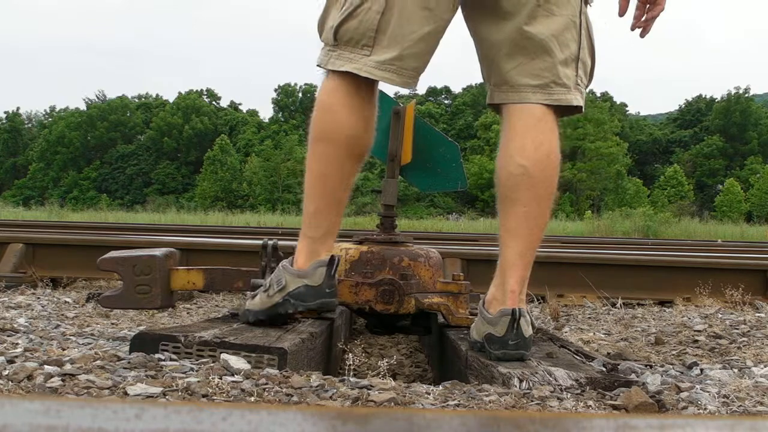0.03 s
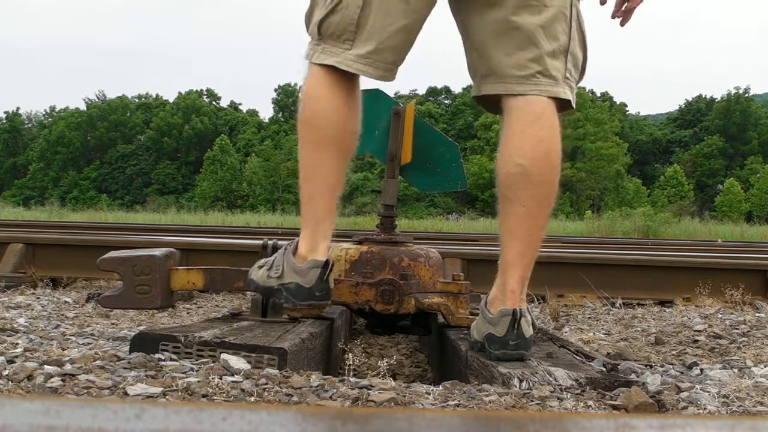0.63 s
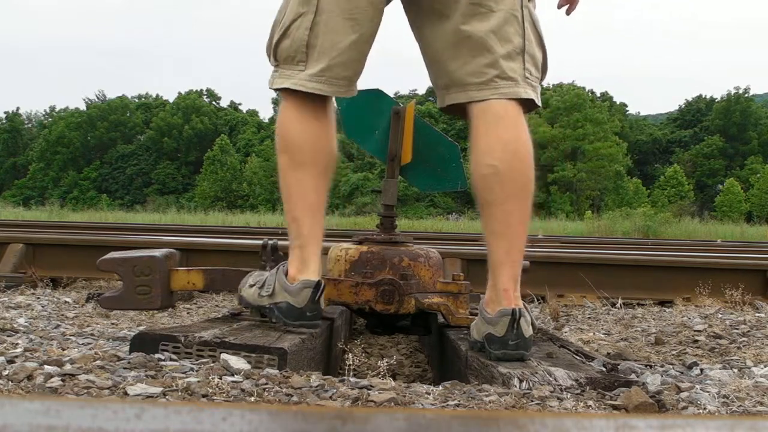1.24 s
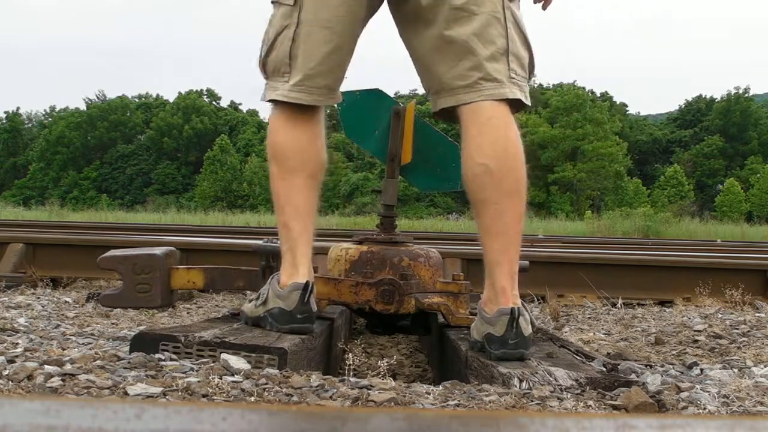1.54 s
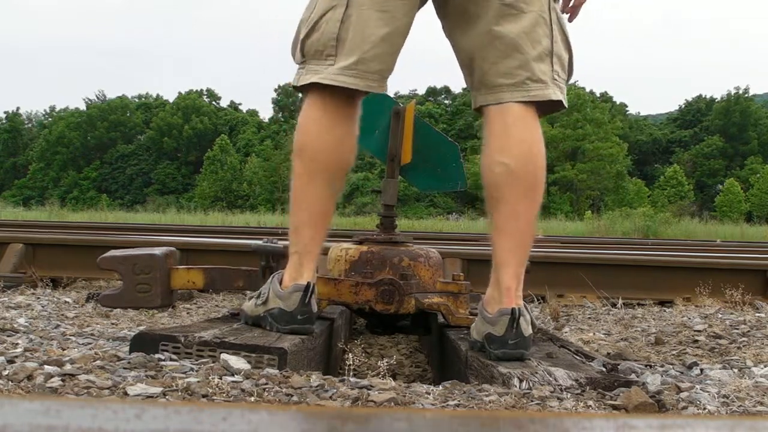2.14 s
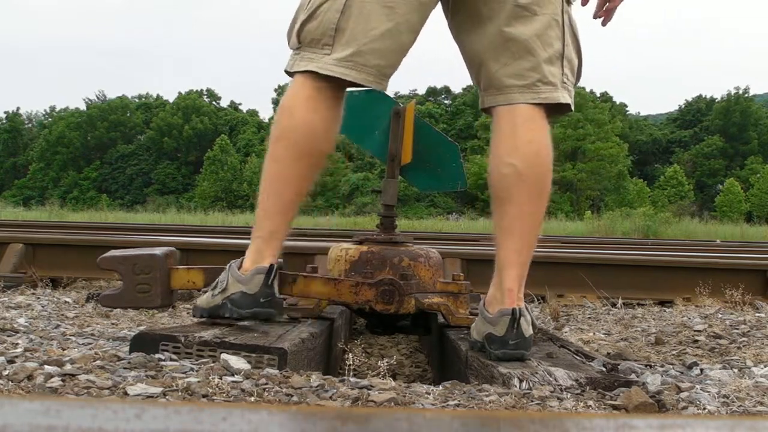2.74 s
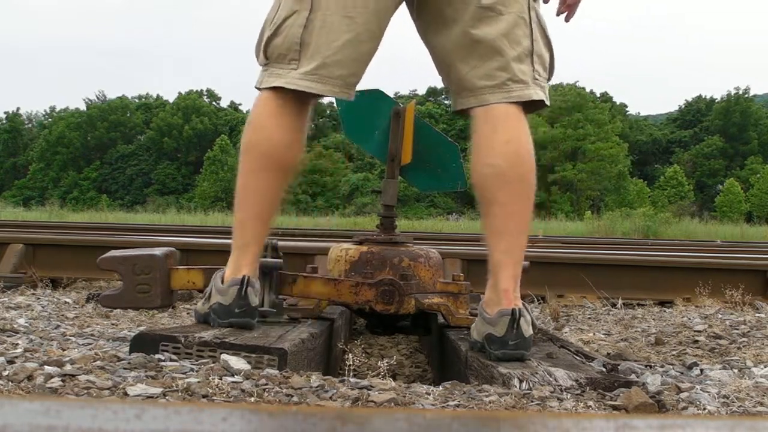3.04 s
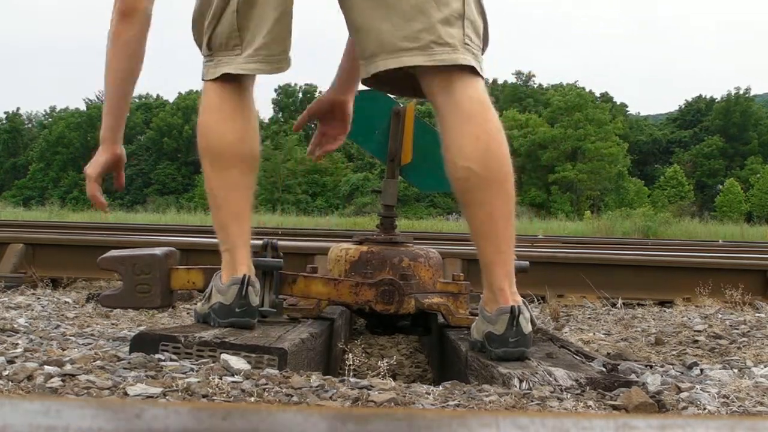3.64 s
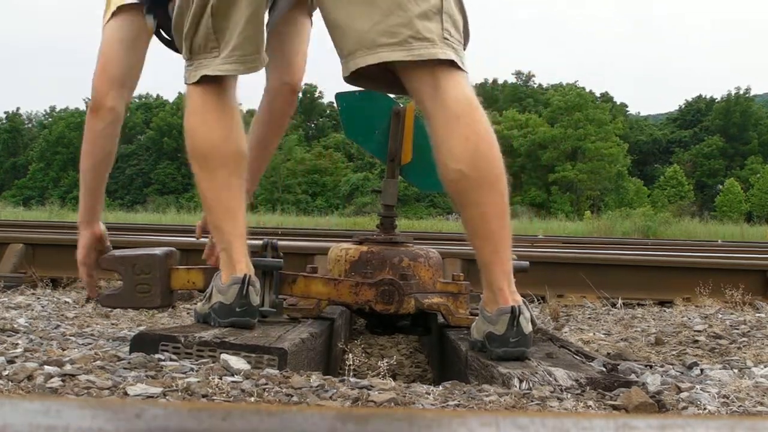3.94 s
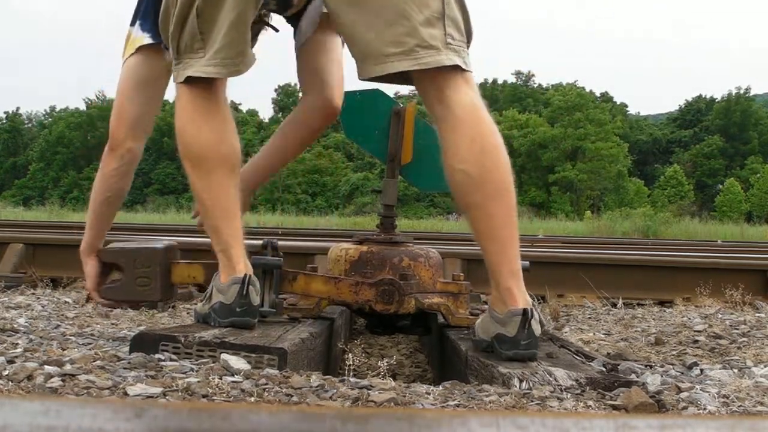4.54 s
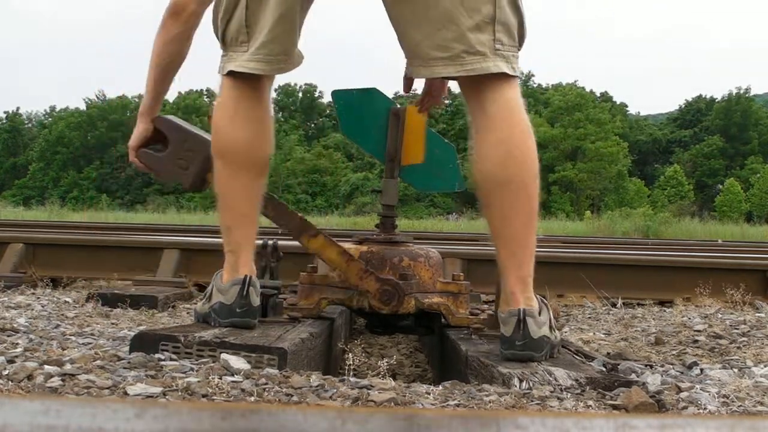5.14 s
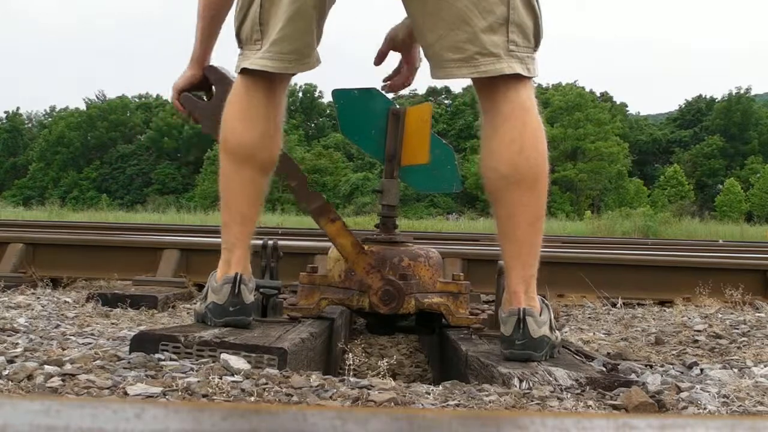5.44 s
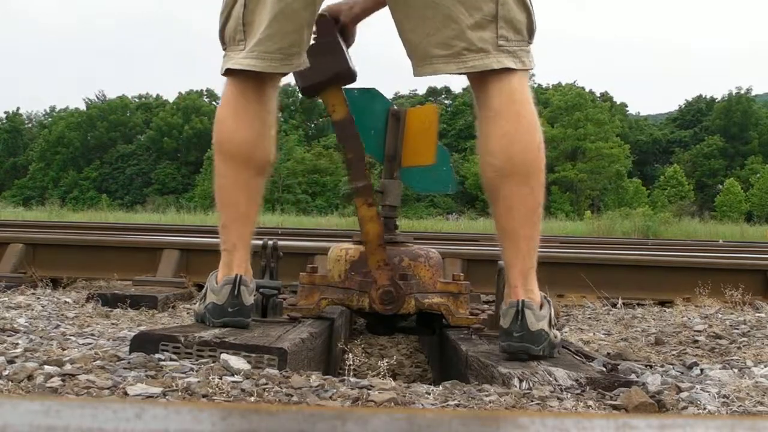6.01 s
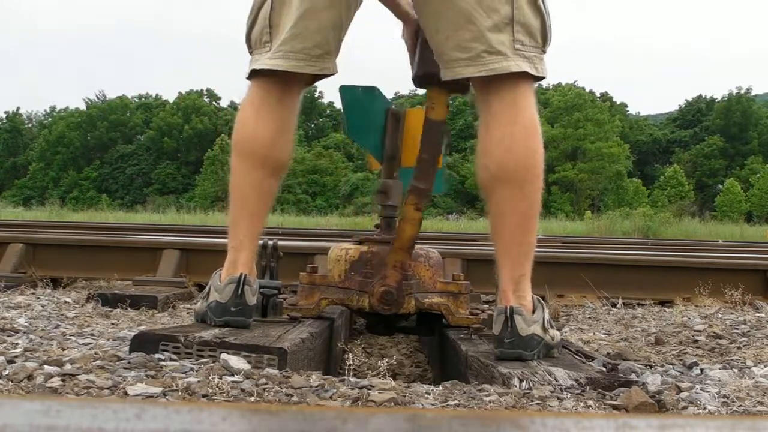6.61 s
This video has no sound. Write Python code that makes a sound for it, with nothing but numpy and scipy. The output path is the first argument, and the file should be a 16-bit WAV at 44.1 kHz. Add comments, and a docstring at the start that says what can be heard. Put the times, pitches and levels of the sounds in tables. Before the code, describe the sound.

Rusty steel clanks, scrapes and briefly squeals as a track switch lever is unlatched and lifted, with diesel engines rumbling far off.

```python
"""A railroad yard in the open air, two closely spaced microphones a few metres from a switch stand.
A foot kicks the rusty latch loose; then the weighted lever is heaved up through it.
Steel knocks on steel and on the timber tie, rust grinds and squeals, and the latch rings.
Ballast and rails scatter the blows, and diesel engines rumble in the distance."""
import sys
import numpy as np
from scipy import signal
from scipy.fft import rfft, irfft, next_fast_len
from scipy.io import wavfile
from scipy.ndimage import uniform_filter1d

SR = 44100
rng = np.random.default_rng(int(sys.argv[2]) if len(sys.argv) > 2 else 0)


def master_out(mix):
    """Clip the mix to full scale and print it as 16-bit PCM to the path in sys.argv[1]."""
    frames = np.transpose(np.atleast_2d(mix))
    ceiling = np.clip(frames, -1, 1)
    pcm = np.round(ceiling * 32767).astype(np.int16)
    wavfile.write(sys.argv[1], SR, pcm)


N = 298548
T = np.arange(16384) / SR  # time axis of one event
HZ = np.fft.rfftfreq(len(T), 1 / SR)


# blows on the stand: start_s, rise_s, clank_db, clatter_db, tilt_db_per_octave
BLOWS = [(0.0315, 0.0015, -36.5, -39.5, -2), (0.0583, 0.00028, -32.5, -21, 2),
         (0.7904, .0005, -35.5, -31, 2), (1.2356, 0.0044, -38.5, -57, -9), (1.3482, .003, -25, -33.5, -7),
         (1.3639, .002, -21.5, -22, 2.5), (1.3786, 0.00013, -19, -12.5, 4), (1.398, .001, -24, -40.5, -1.5),
         (1.4148, .002, -23.5, -28.5, -5), (1.449, 0.0034, -34, -48, -11.5), (1.568, .001, -48, -50, -3.5),
         (2.178, 0.0011, -42.5, -43.5, -2.5), (2.197, .001, -39.5, -45, -2),
         (2.221, 0.0026, -34.5, -45, -4), (2.2913, .0002, -25.5, -35.5, -9.5),
         (2.32, 0.00088, -33, -41.5, -3), (2.346, .005, -32, -53, -11), (2.5083, 0.0035, -51, -55, -7),
         (3.5857, 0.00082, -63, -56.5, 6.5), (3.7437, .001, -70, -46, 1), (4.5671, 0.00026, -32, -42.5, -9),
         (4.583, 0.002, -42.5, -38.5, 0.5), (4.6325, 0.00017, -27, -33, -9.5), (4.6534, .0002, -33, -31, 1),
         (4.675, 0.00084, -54.5, -36.5, -1), (4.7533, 0.00022, -28.5, -34.5, -8.5),
         (4.779, .002, -40.5, -36.5, 3), (4.7972, .0002, -47.5, -25, 3.5),
         (4.951, 0.00021, -32.5, -15.5, 4.5), (5.032, 0.0022, -51.5, -37.5, -0.5),
         (5.539, 0.0029, -51, -50, -7.5), (5.6565, 0.0024, -50, -51.5, -11.5),
         (5.876, 0.0019, -61, -49.5, -4.5)]
# modes of the stand: pitch_hz, level_db, t60_s, group (0 timber, 1 casting)
STAND_MODES = [(135, -3, .42, 0), (157, -1, .28, 0), (192, -2, .13, 0), (290, -3, .11, 0),
               (322, -7, .13, 1), (356, 0, .26, 1), (392, -6, .33, 1), (422, -8, .17, 1), (499, -3, .24, 1),
               (558, -12, .13, 1), (688, -12, .12, 1), (748, -2, .17, 1), (785, -6, .15, 1),
               (829, -2, .13, 1), (900, -4, .15, 1), (948, -7, .14, 1)]
# heavy blows wake the casting's upper modes: clank_db, gain_db
UPPER_MODE_GAIN = [(-28.5, -4.5), (-18, 5)]
# borders of one low clank band and three clatter bands: edge_hz
BAND_EDGES = [200, 1000, 2600, 7000, 17000]

def knocks(joints, clatter_hz=4300, upper_from_hz=650, freed_s=2.0, crack_s=.0013, body_lag_s=.00073):
    """Each blow cracks, clatters in the joints and shakes the casting on its timber."""
    out, waves = np.zeros(N), free_ringing(STAND_MODES)
    edges = np.array(BAND_EDGES)
    bands = np.array([unit(joints * (HZ > lo) * (HZ <= hi)) for lo, hi in zip(edges, edges[1:])])
    octaves = np.log2(np.sqrt(edges[1:-1] * edges[2:]) / clatter_hz)
    upper = np.array(STAND_MODES)[:, :1] > upper_from_hz
    for start, rise, clank_db, clatter_db, tilt_db in BLOWS + rebounds():
        band_db = clatter_db + tilt_db * octaves - 2.5 * octaves ** 2  # a tilted arch
        gains = np.append(.45 * amp(clank_db), amp(band_db))  # part of the clank dies with the clatter
        contact = rfft(unit(grit(spread_db=1.5)))
        clatter = irfft(contact * (gains[:, None] * bands).sum(0), len(T))
        t60 = .047 + 11 * rise  # a softer contact clatters for longer
        crack = .16 * np.exp(-T / crack_s)
        clatter *= (np.exp(-np.log(1000) * T / t60) + crack) * (1 - np.exp(-T / rise))
        thud_db = clank_db + (.5 if start > freed_s else -11.5)  # the freed lever thuds into the timber
        wake = amp(upper * np.interp(clank_db, *np.transpose(UPPER_MODE_GAIN))).astype(np.float32)
        body = ring(STAND_MODES, wake * waves, [thud_db, clank_db], spread_db=3)
        body *= 1 - np.exp(-T / (rise + body_lag_s))
        add(out, start, clatter + .81 * body)
    return out


def rebounds(sharp_s=.0004, delay_s=.047, rise_s=.0022, drop_db=18.5):
    """A sharp blow bounces once, softer and duller."""
    return [(start + delay_s, rise_s, clank_db - drop_db, clatter_db - drop_db, tilt_db - 2.5)
            for start, rise, clank_db, clatter_db, tilt_db in BLOWS if rise < sharp_s]


# spectrum of the rusty joints: frequency_hz, level_db
JOINT_SPECTRUM = [(220, 3.5), (370, 8.5), (610, 4), (820, 2), (1030, -2.5), (1400, 3.5), (2300, -1),
                  (3400, 0.5), (4000, -4), (5000, -1), (6100, -2.5), (7000, -0.5), (8600, -6),
                  (10500, -4.5), (16000, -1.5)]

def joint_colour(ripple_db=8, latch_db=9, width_hz=45):
    """The many close resonances of the rusty assembly; the latch's modes stand out of them."""
    ripple = uniform_filter1d(rng.standard_normal(len(HZ)), size=22)
    ripple = unit(uniform_filter1d(ripple, size=14))
    ripple = np.clip(unit(ripple - uniform_filter1d(ripple, size=130)), -2, 1.5)
    peaks = np.max([1 / (1 + ((HZ - mode[0]) / width_hz) ** 2) for mode in LATCH_MODES], axis=0)
    return amp(read(JOINT_SPECTRUM, HZ) + ripple_db * ripple * (.5 - peaks) + latch_db * peaks)


# modes of the latch: pitch_hz, level_db, t60_s, group (excited together)
LATCH_MODES = [(2770, -10, .07, 0), (3512, 0, .12, 0), (4492, 0, .15, 1), (5020, -12, .1, 1),
               (5457, -10, .13, 1), (5848, -6, .13, 1), (6070, -9, .11, 1), (6192, -7, .15, 1),
               (7498, 0, .29, 2), (9510, -13, .16, 3), (9960, 0, .12, 3), (10704, -12, .12, 3),
               (10909, -12, .14, 3), (12225, -10, .15, 4), (12749, 0, .33, 4), (13762, 0, .2, 5),
               (14320, -9, .1, 5), (15035, -14, .12, 5), (15592, -3, .22, 5)]
# jolts to the latch: start_s, level_db, driven_hz, seat_damping_db_per_s
LATCH_JOLTS = [(0.0581, -29.5, 7200, 19.5), (0.79, -18, 3300, 2000), (1.3818, -16, 5400, 1499.5),
               (1.413, -31.5, 12700, 79), (2.198, -32, 4200, 55), (2.321, -56, 7560, 50),
               (4.585, -39, 4300, 48), (4.6328, -38.5, 12400, 12), (4.656, -30.5, 7300, 13),
               (4.7953, -23.5, 4100, 160), (4.9512, -16.5, 11200, 47), (5.033, -40, 5000, 10)]

def latch(rise_s=.0008, width_octaves=.65, off_pitch_db=-21):
    """The latch rings most near the pitch the contact drives, longer when it hangs free of its seat."""
    out, waves = np.zeros(N), free_ringing(LATCH_MODES)
    hz, _, _, group = np.transpose(LATCH_MODES)
    group_hz = np.array([hz[group == g].mean() for g in np.unique(group)])
    for start, db, driven_hz, damping in LATCH_JOLTS:
        nearness = np.exp(-(np.log2(group_hz / driven_hz) / width_octaves) ** 2)
        ringing = ring(LATCH_MODES, waves, db + off_pitch_db * (1 - nearness), spread_db=2)
        add(out, start, ringing * amp(-damping * T) * (1 - np.exp(-T / rise_s)))
    return out


# steel sticking and slipping: start_s, length_s, pitch_hz, level_db
STICK_SLIPS = [(0.761, 0.024, 3600, -41.5), (1.356, 0.025, 7500, -10.5), (1.375, 0.0099, 5480, -20),
               (1.412, 0.038, 3530, -24.5), (1.461, 0.032, 3535, -42), (2.177, 0.051, 3516, -42),
               (2.318, 0.024, 5000, -53), (2.501, .029, 2084, -53), (4.653, 0.033, 3520, -34.5),
               (4.658, 0.044, 4497, -36.5), (4.711, .022, 3500, -52), (4.79, 0.045, 10930, -30.5),
               (4.797, 0.026, 6066, -35), (4.822, 0.037, 3494, -42), (4.951, 0.051, 5450, -26),
               (4.952, 0.053, 4506, -22), (4.965, 0.036, 3530, -35.5), (4.988, 0.014, 6120, -25.5),
               (5.014, .03, 3530, -46), (5.085, 0.055, 5480, -53.5), (5.535, .04, 3620, -54),
               (5.658, 0.044, 1760, -52), (5.873, 0.054, 3610, -50), (6.555, .044, 3610, -56.5)]

def squeals(waver_hz=28, roughness=.28, faint_db=-37):
    """Friction pumps one mode for a moment, a little unsteadily, then chokes it."""
    out = np.zeros(N)
    for start, length, hz, db in STICK_SLIPS:
        drift, shake = unit(uniform_filter1d(rng.standard_normal((2, len(T))), size=160))
        rise = min(.004 + .05 * max(db - faint_db, 0), length / 2)  # loud squeals build more slowly
        ramp = np.interp(T, [0, rise, length], [0, 1, 0])
        grip = np.sin(np.pi / 2 * ramp ** .67) ** 2
        tone = np.sqrt(2) * np.sin(2 * np.pi * np.cumsum(hz + waver_hz * drift) / SR)
        add(out, start, amp(db) * grip * (1 + roughness * shake) * tone)
    return out


# slides over rust: catch_s, lead_in_s, run_out_s, level_db, tilt_db_per_octave
RUST_SLIDES = [(.059, 0.023, 0.052, -39.5, -1.5), (.795, 0.041, 0.034, -40.5, -3.5),
               (1.365, .026, .01, -29.5, -0.5), (1.388, 0.027, 0.042, -18.5, -3),
               (1.45, 0.0036, 0.117, -44, -4.5), (2.25, 0.068, 0.12, -45, -6.5),
               (4.42, 0.014, 0.027, -53, -3), (4.646, .05, .035, -37.5, -3), (4.799, .04, .035, -34, -3),
               (4.955, .033, 0.051, -26.5, 0.5), (5.54, 0.0035, 0.025, -44, -8.5),
               (5.878, .003, 0.025, -46, -12), (6.12, 0.033, .06, -57, -3)]

def scrapes(joints, low_hz=300, pivot_hz=4000, swell_db=11.5, fade_db=10.5):
    """Rust flakes break and rattle the joints, harder until the parts catch, then easing off."""
    out = np.zeros(N)
    for catch, lead, run_out, db, tilt_db in RUST_SLIDES:
        length = lead + run_out
        tilt = amp(tilt_db * np.log2((HZ + low_hz) / pivot_hz))
        low_cut = HZ ** 2 / (HZ ** 2 + low_hz ** 2)
        force = amp(db - np.interp(T, [0, lead, length], [swell_db, 0, fade_db]))
        force *= (1 - np.exp(-T / .0025)) * np.exp(-np.maximum(T - length, 0) / .0018)  # soft ends
        grinding = irfft(rfft(grit(spread_db=4.5)) * joints * tilt * low_cut, len(T))
        add(out, catch - lead, force * unit(grinding))
    return out


# two faint whistles during the lever's swing: start_s, length_s
SWING_WHISTLES = [(5.947, 0.055), (6.102, 0.097)]

def whistles(pitch_hz=3250, fall_octaves_per_s=5.5, level_db=-63):
    """A thin tone swells and slides down, barely above the background."""
    out = np.zeros(N)
    hz = pitch_hz * 2 ** (-fall_octaves_per_s * T)
    for start, length in SWING_WHISTLES:
        swell = np.sin(np.pi * np.minimum(T / length, 1))
        add(out, start, amp(level_db) * swell * np.sin(2 * np.pi * np.cumsum(hz) / SR))
    return out


# decay of sound scattered by open ground: frequency_hz, t60_s
GROUND_DECAY = [(150, .5), (1000, .42), (5000, 0.27), (15000, 0.11)]

def ground_echoes(direct, near_db=-15, near_s=.006, far_db=-24):
    """Adds quick reflections off ballast and rails and a thin tail, different at each microphone."""
    near, far = rng.standard_normal((2, 2, len(T)))
    near *= np.exp(-T / near_s) * (T > .001)
    hz, t, spectra = signal.stft(far, SR, nperseg=256)
    spectra *= np.exp(-np.log(1000) * t / read(GROUND_DECAY, hz)[:, None])
    far = signal.istft(spectra, SR)[1][:, :len(T)] * (T > .012)
    echoes = sum(amp(db) * taps / np.linalg.norm(taps, axis=1, keepdims=True)
                 for db, taps in [(near_db, near), (far_db, far)])
    return direct + signal.oaconvolve(direct[None], echoes, axes=1)[:, :N]


# the yard's background: frequency_hz, level_db
YARD_SPECTRUM = [(20, -36), (35, -23.5), (55, -13), (72, -3), (125, -6), (180, -9.5), (260, -14.5),
                 (450, -20), (620, -25), (1200, -31), (2300, -35.5), (4500, -39.5), (8000, -43.5),
                 (16000, -45.5)]
# its likeness at the two microphones: frequency_hz, correlation
YARD_COHERENCE = [(60, 0.67), (130, 0.99), (290, 0.98), (640, 0.89), (1410, 0.76), (3100, 0.41),
                  (6820, 0.079), (15000, 0.08)]
# the engines ease off, then grow a little louder toward the end: time_s, gain_db
ENGINE_SWELL = [(0, 0.86), (4.1, -1.5), (5.3, 2), (6.77, 2.5)]
# spectral humps of far-off machinery: centre_hz, width_hz, gain_db
MACHINE_HUMPS = [(73, 4.9, 4), (94.9, 8, 2), (143.85, 5, 9.5), (401, 36, 7), (1832, 140, 5.5),
                 (2933, 110, 3.5), (6170, 700, 3)]

def distant_engines(level_db=-42, waver_db=1.77, rumble_hz=450):
    """Diesels far across the yard rumble and waver under a faint hiss of open air."""
    size, hop = 4096, 2048
    hz, t = np.fft.rfftfreq(size, 1 / SR), np.arange(0, N + 2 * hop, hop) / SR
    draws = rng.standard_normal((5, len(t), len(hz)), dtype=np.float32)
    left, separate = draws[0] + 1j * draws[1], draws[2] + 1j * draws[3]
    likeness = np.clip(read(YARD_COHERENCE, hz), -1, 1)
    right = likeness * left + np.sqrt(1 - likeness ** 2) * separate
    humps_db = sum(db * np.exp(-.5 * ((hz - centre) / width) ** 2) for centre, width, db in MACHINE_HUMPS)
    swell_db = np.interp(t, *np.transpose(ENGINE_SWELL))[:, None] / (1 + (hz / rumble_hz) ** 2)
    waver = unit(uniform_filter1d(uniform_filter1d(draws[4], size=3, axis=0), size=20, axis=1))
    gain = amp(read(YARD_SPECTRUM, hz) + humps_db + swell_db + waver_db * waver)
    frames = irfft(np.array([left, right]) * gain) * signal.windows.cosine(size)
    overlapped = frames[:, 1:, :hop] + frames[:, :-1, hop:]
    return amp(level_db) * unit(overlapped.reshape(2, -1)[:, :N])


def free_ringing(modes):
    """The dying wave of each mode, as a complex rotation."""
    hz, _, t60, _ = np.transpose(modes)
    return np.exp((2j * np.pi * hz - np.log(1000) / t60)[:, None] * T).astype(np.complex64)


def ring(modes, waves, group_db, spread_db):
    """One blow on a set of modes; each group shares out its level, unevenly from blow to blow."""
    hz, db, _, group = np.transpose(modes)
    group = group.astype(int)
    size = amp(db + spread_db * rng.standard_normal(len(hz)))
    size *= amp(group_db)[group] / np.sqrt(np.bincount(group, size ** 2)[group] / 2)
    kick = size * np.exp(2j * np.pi * rng.random(len(hz)))
    return (kick.astype(np.complex64)[:, None] * waves).sum(0).real


def grit(spread_db):
    """Noise of countless tiny contacts of uneven size."""
    size, noise = rng.standard_normal((2, len(T)))
    return noise * amp(spread_db * np.clip(unit(uniform_filter1d(size, size=30)), -2, 2))


def amp(db):
    """Decibels to gain."""
    return 10 ** (np.asarray(db) / 20)


def unit(x):
    """Scales to an rms of one."""
    return x / np.sqrt(np.mean(x ** 2) + 1e-20)


def read(points, hz):
    """Reads a table on a log-frequency axis."""
    point_hz, value = np.transpose(points)
    return np.interp(np.log(hz + 1), np.log(point_hz + 1), value)


def add(mix, start_s, sound):
    """Mixes a sound in at start_s."""
    part = mix[max(round(start_s * SR), 0):][:len(sound)]
    part += sound[:len(part)]


def scene():
    """The stand a few metres straight ahead, the engines far off."""
    joints = joint_colour()
    stand = knocks(joints) + latch() + squeals() + scrapes(joints) + whistles()
    return ground_echoes(stand) + distant_engines()


# balance of the microphones: frequency_hz, left_minus_right_db
MIC_BALANCE = [(60, -.3), (150, 0.75), (380, 0.47), (1300, -0.32), (2400, 0.6), (4400, -1.2),
               (15000, -0.45)]
# phase between them: frequency_hz, left_lead_rad
MIC_PHASE = [(100, 0), (3000, 0.28), (8000, 0.96), (15000, 0.84)]

def record(dry, cutoff_hz=15950):
    """A closely spaced microphone pair, slightly apart in level and phase, with a steep treble limit."""
    size = next_fast_len(N, True)
    hz = np.fft.rfftfreq(size, 1 / SR)
    left = amp(read(MIC_BALANCE, hz) / 2) * np.exp(.5j * read(MIC_PHASE, hz))
    lowpass = 1 / (1 + (hz / cutoff_hz) ** 200)
    return irfft(rfft(dry, size) * np.array([left, 1 / left]) * lowpass, size)[:, :N]


dry = scene()
out = record(dry)
master_out(out)
```